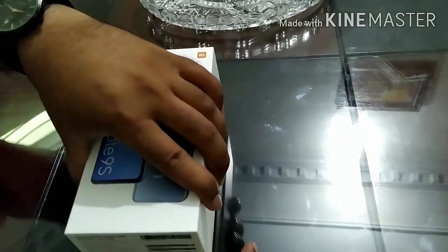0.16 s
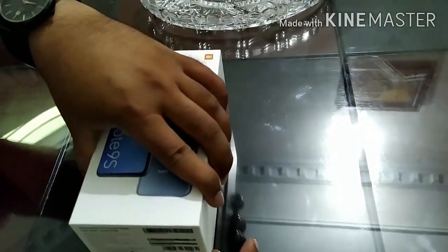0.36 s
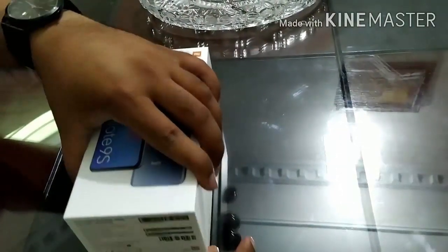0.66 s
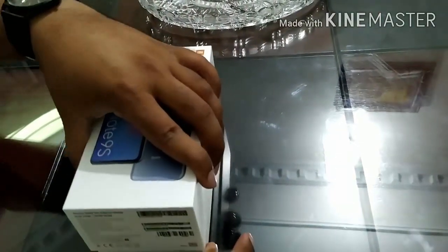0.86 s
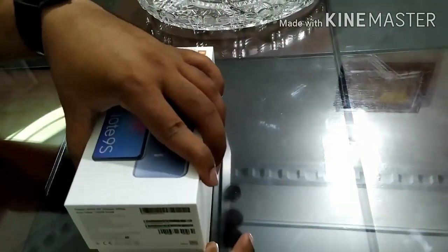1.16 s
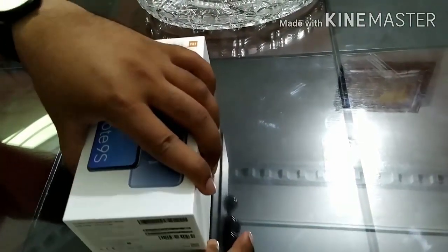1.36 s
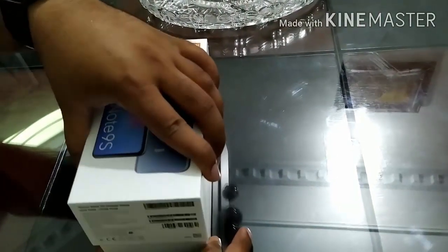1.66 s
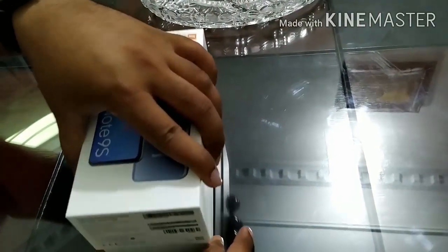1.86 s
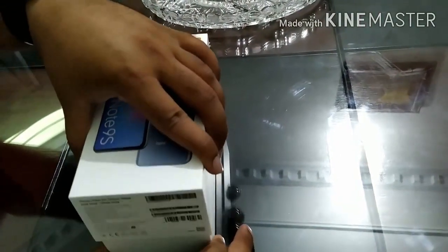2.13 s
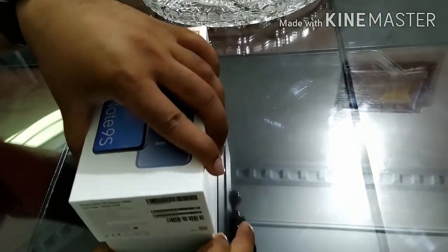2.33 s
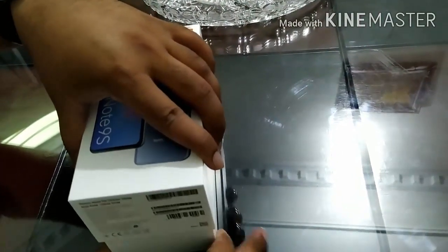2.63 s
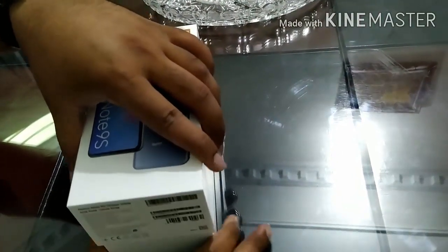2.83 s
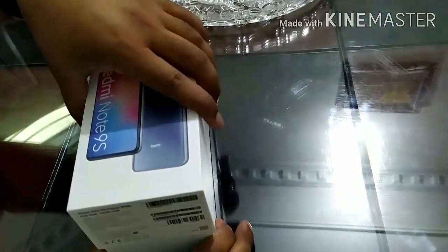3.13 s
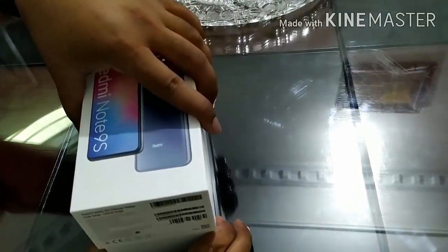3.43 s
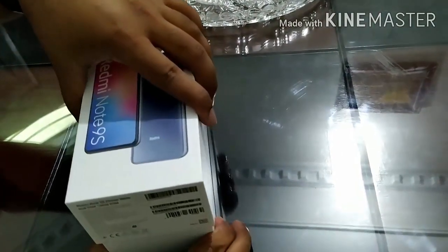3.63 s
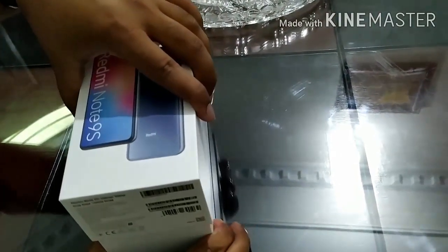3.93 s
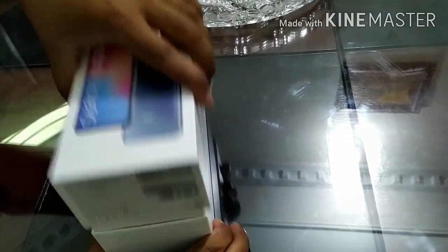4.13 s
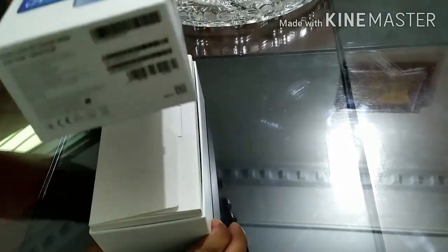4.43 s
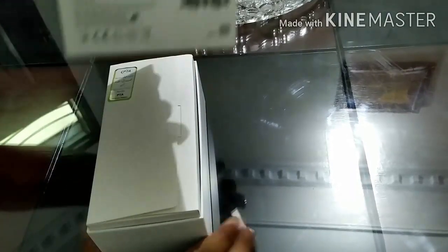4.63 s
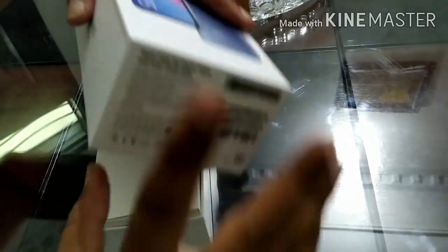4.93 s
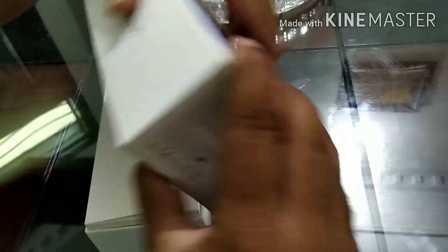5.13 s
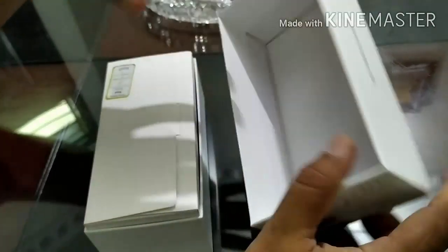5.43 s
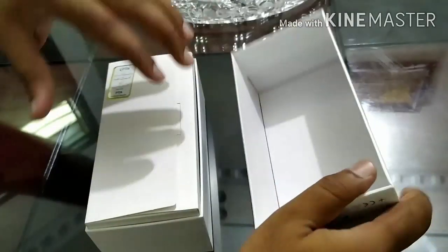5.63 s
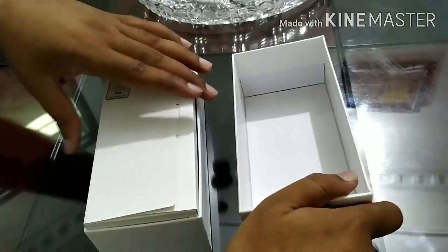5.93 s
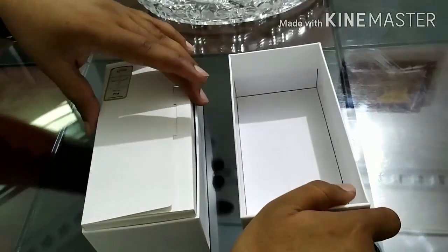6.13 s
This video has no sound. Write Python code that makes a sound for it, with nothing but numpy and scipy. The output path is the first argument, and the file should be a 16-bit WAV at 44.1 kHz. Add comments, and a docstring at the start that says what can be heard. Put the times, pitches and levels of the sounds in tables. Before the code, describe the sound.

A stiff cardboard box is bumped repeatedly on a table, with faint finger rubs and clicks, until the lid comes free with a pop.

```python
"""A low hum and a soft hiss fill a small boomy room, with faint thin squeaks now and then.
A stiff cardboard box is bumped on a glass table to loosen its tight lid; each thump booms in the room.
The lid rubs along the box, fingers shift on the paper, and nails or card edges slip off with clicks.
The lid leaves with a pop as air rushes in, is turned over, and is set down with a hollow knock."""
import sys
import numpy as np
from scipy import signal
from scipy.fft import rfft, irfft, next_fast_len
from scipy.io import wavfile
from scipy.ndimage import uniform_filter1d, map_coordinates

SR = 44100
rng = np.random.default_rng(int(sys.argv[2]) if len(sys.argv) > 2 else 0)


def transcribe(signal):
    """Save signal, clipped to [-1, 1], as a 16-bit WAV file at the path in sys.argv[1]."""
    frames = np.atleast_2d(signal).T
    limited = np.clip(frames, -1, 1)
    pcm = np.round(limited * 32767).astype(np.int16)
    wavfile.write(sys.argv[1], SR, pcm)


N = 277521

# The colour of the room's hiss: f/Hz, level/dB
HISS_COLOUR = [(15, -39), (25, -9), (93, -1), (160, -18.5), (240, -12.5), (445, -19), (482, -20),
               (582, -24.5), (684, -23), (1020, -26), (1140, -27), (3340, -32), (4620, -34.5),
               (5280, -35.5), (15500, -40)]

def background():
    """A soft hiss and a wavering low hum go on throughout."""
    hiss = unit(filtered(rng.standard_normal(N), lambda f: amp(along(HISS_COLOUR, f))))
    hum = wavering_tone(N, hz=96.94, width_hz=10.7)
    return amp(-51.5) * hiss + amp(-54.5) * hum


# The higher tones of a squeak: multiple of its pitch, level/dB added to its overtone level
SQUEAK_OVERTONES = [(1.71, 0), (2.54, -4)]
# Faint thin squeaks: t/s, length/s, f/Hz, width/Hz, level/dB, overtone level/dB
THIN_SQUEAKS = [(.11, .14, 4700, 400, -66.5, -20), (.68, .1, 1693, 140, -58, -20),
                (1.39, .26, 3817, 400, -58, -21), (1.42, .17, 4600, 370, -62.5, -21),
                (1.74, .1, 4100, 900, -60, -20), (1.85, .1, 3950, 520, -67, 7.5),
                (2.19, .21, 3620, 370, -60, -4.5), (2.7, .1, 4400, 900, -56, -20),
                (5.26, .18, 4600, 800, -60.5, -15)]

def squeaks(flutter_db=3):
    """Narrow bands of hiss with two overtones swell, flutter and fade."""
    out = np.zeros(N)
    for s, length, hz, width_hz, db, overtones_db in THIN_SQUEAKS:
        tone = wavering_tone(SR, hz, width_hz)
        for multiple, own_db in SQUEAK_OVERTONES:
            tone += amp(overtones_db + own_db) * wavering_tone(SR, multiple * hz, width_hz)
        wobble = unit(uniform_filter1d(rng.standard_normal(SR), size=900))
        flutter = unit(amp(flutter_db * wobble))
        swell = held(0, length, attack_s=.04, release_s=.055)[:SR]
        add(out, s, amp(db) * swell * flutter * tone)
    return out


# The notes of the full box on the table: f/Hz, width/Hz, level/dB
BOX_NOTES = [(99, 53, 2), (430, 241, -3), (545, 206, -3), (800, 210, -10.5), (1072, 136, -9)]
# The box lands or is pressed down: t/s, level/dB, hardness/Hz, panel f/Hz, panel's share/dB
BOX_BUMPS = [(.3458, 24.3, 490, 344, -26), (.527, 2, 480, 243, 6), (.7786, 29.3, 1950, 1880, -25),
             (.928, 14.5, 397, 302, -11.5), (1.0887, 23, 560, 420, -16), (1.6788, 26.6, 1150, 1800, -24),
             (2.208, 29, 1245, 443, -32), (2.6592, 28, 1300, 406, -6), (3.171, 15.5, 81, 400, -30),
             (3.289, 14, 81, 400, -30)]

def box_bumps(edge_lead_s=0.0089, edge_db=-24):
    """One edge grazes the glass, then the heavy box thumps down, rings one panel and ticks."""
    out = np.zeros(N)
    for s, db, hardness_hz, panel_hz, panel_db in BOX_BUMPS:
        thump = amp(db) * blow(BOX_NOTES, hardness_hz)
        panel = amp(db + panel_db) * blow([(panel_hz, 170, 0)], hardness_hz)  # 170 Hz wide
        tick_db = db - 73.5 + 4 * np.log2(hardness_hz / 1000)  # harder contacts tick more
        add(out, s - edge_lead_s, amp(db + edge_db) * blow(BOX_NOTES, min(hardness_hz, 700)))
        add(out, s, room(thump - panel, wet_db=-1) + boom(thump))
        add(out, s, room(amp(tick_db) * tick(pitch_hz=3600, life_s=0.0032), wet_db=-6))
    return out


# The colour of the lid rubbing on the box: f/Hz, level/dB
SLIDE_COLOUR = [(100, -9), (300, 2), (700, -6.5), (1150, -4.5), (1700, -17), (4000, -18.5), (12000, -35)]
# Pulls on the lid: t/s, length/s, level/dB
LID_PULLS = [(.63, .85, -57), (3.6, .58, -56.5), (6.22, .1, -55)]

def lid_slide():
    """The tight lid rubs faintly as it creeps along the box."""
    pull = sum(amp(db) * held(s, length, attack_s=.06, release_s=.07) for s, length, db in LID_PULLS)
    return pull * unit(filtered(friction(N), lambda f: amp(along(SLIDE_COLOUR, f))))


# Skin slides on paper: loudest t/s, rise/s, level/dB, brightness/dB per octave
FINGER_RUBS = [(.875, .038, -47.3, -6.5), (.938, .035, -54, 1.5), (1.427, .027, -52, -7),
               (1.878, .014, -49, -3.5), (2.795, .065, -51.5, -6.5), (2.868, .05, -46, -2.5),
               (3.21, .025, -58.5, 4), (3.62, .1, -64.5, 4), (4.705, .028, -55.5, -2.5),
               (4.781, .033, -54.5, 6), (4.889, .027, -47.5, .5), (5.87, .035, -51.5, -9)]

def finger_rubs():
    """Fingers shift their grip in short strokes."""
    out = np.zeros(N)
    for s, rise_s, db, tilt_db in FINGER_RUBS:
        rub = amp(db) * stroke(rise_s, 1.1 * rise_s, tilt_db, rasp_hz=7100)
        add(out, s - .5, room(rub, wet_db=-5))
    return out


# A nail or card edge slips: t/s, click level/dB, scrape level/dB, f/Hz
EDGE_SNAPS = [(1.6788, -37, -70, 5000), (2.8315, -22.5, -42, 11000), (2.983, -34.5, -55, 5500),
              (2.985, -32.5, -46, 10400), (3.024, -38, -52, 10800), (3.091, -46, -56, 7200),
              (4.206, -24, -46, 5830), (4.7385, -32, -45, 13500), (5.157, -48, -55.5, 2300),
              (5.229, -49, -49, 5400), (5.2425, -37.5, -42, 13000), (5.8207, -42, -66, 3840)]

def edge_snaps():
    """Nails and card edges scrape briefly and slip off with dry clicks."""
    out = np.zeros(N)
    for s, click_db, scrape_db, pitch_hz in EDGE_SNAPS:
        tilt_db = 2.5 * np.log2(pitch_hz / 9000)  # higher scrapes are brighter
        scrape = amp(scrape_db) * stroke(rise_s=.012, fall_s=.012, tilt_db=tilt_db, rasp_hz=pitch_hz)
        add(out, s - .5, room(scrape, wet_db=-5))
        click = amp(click_db) * tick(pitch_hz, life_s=0.0015, ping_db=14.5, ping_octaves=0.3)
        add(out, s, room(click, wet_db=-6))
    return out


# The notes of the hollow lid: f/Hz, width/Hz, level/dB
LID_NOTES = [(140.6, 34, -12.5), (236, 18, 3.5), (312, 30, 2.5), (460, 58, 0), (795, 98, -0.5),
             (1150, 130, -5.5), (1370, 155, -15.5), (1950, 40.3, -15), (2250, 110, -21)]
# The lid is touched, knocked and set down: t/s, level/dB, hardness/Hz
LID_TAPS = [(4.2398, 18.5, 1720), (4.2815, 6, 1080), (2.831, 3.5, 1110), (2.984, 2, 1090),
            (5.1554, -4, 3510), (5.2414, 4, 2520), (5.281, 2.5, 420), (5.8208, 21, 4080), (5.826, 22, 1657)]

def lid_taps():
    """The hollow lid rings when it meets fingers or the table."""
    out = np.zeros(N)
    for s, db, hardness_hz in LID_TAPS:
        knock = amp(db) * blow(LID_NOTES, hardness_hz)
        add(out, s, room(knock, wet_db=-2) + amp(0.5) * boom(knock))
    return out


# The notes of the air inside the lid: f/Hz, width/Hz, level/dB
AIR_NOTES = [(168, 99, 3.5), (389, 109, 3), (554, 113, -3.5), (825, 85, -2.5), (1080, 140, -9),
             (2440, 300, -25.5)]

def lid_pop(free_s=4.2045, rush_after_s=.023):
    """The rim scrapes free, the suction under the lid lets go, air rushes in and rings briefly."""
    out = np.zeros(N)
    puff = amp(31) * blow(AIR_NOTES, hardness_hz=2380, low_hz=120)
    add(out, free_s, room(puff, wet_db=-3.5) + amp(-11) * boom(puff))
    rim = amp(-30) * stroke(rise_s=.0075, fall_s=.006, tilt_db=2, rasp_hz=2400)
    rush = amp(-42) * stroke(rise_s=.025, fall_s=.014, tilt_db=-4.5, rasp_hz=11300)
    add(out, free_s - .5, room(rim, wet_db=-5))
    add(out, free_s + rush_after_s - .5, room(rush, wet_db=-5))
    return out


# The notes of the lid's walls while it is held: f/Hz, width/Hz, level/dB
HELD_LID_NOTES = [(273, 27, 8.5), (410, 290, -5), (840, 140, -4), (1270, 140, -4), (1570, 190, -8)]

def lid_turn(peak_s=5.248, fade_s=.019):
    """The lid scuffs hollowly as it turns in the palm."""
    t = np.arange(N) / SR - peak_s
    swell = amp(-37.5) * np.exp(-np.abs(t) / fade_s)
    scuff = swell * unit(filtered(friction(N), lambda f: ring(HELD_LID_NOTES, f)))
    return room(scuff, wet_db=-10)


def wavering_tone(size, hz, width_hz):
    """Noise narrowed to a thin band around one pitch."""
    return unit(filtered(rng.standard_normal(size), lambda f: ring([(hz, width_hz, 0)], f) ** 2))


def blow(modes, hardness_hz, low_hz=60):
    """One push rings a body's notes; a harder contact lets more treble through."""
    push = signal.unit_impulse(SR)
    return filtered(push, lambda f: ring(modes, f) * soften(f, hardness_hz) * 1j * f / (low_hz + 1j * f))


# How long the room's echo lasts: f/Hz, time/s to fade by 60 dB
ECHO_FADE = [(100, 0.81), (400, 0.4), (1100, 0.44), (3000, 0.41), (8000, 0.5), (15000, 0.29)]
# The colour of that echo against the direct sound: f/Hz, level/dB
ECHO_COLOUR = [(60, -4), (170, -8.5), (300, -1), (1000, -2), (3000, 6), (12000, -1)]

def room(x, wet_db, build_s=0.007):
    """A sound plus its wash of echoes, which is new for every place of the hand."""
    hz, t, noise = signal.stft(rng.standard_normal(SR // 2), SR, nperseg=256)
    shape = amp(-60 * t / along(ECHO_FADE, hz)[:, None]) * (1 - np.exp(-t / build_s))
    energy = np.sum(shape ** 2, axis=1, keepdims=True) * t[1] * SR
    shape *= amp(along(ECHO_COLOUR, hz))[:, None] / np.sqrt(energy)
    tail = signal.istft(noise * shape, SR, nperseg=256)[1]
    return x + amp(wet_db) * signal.fftconvolve(x, tail)[:len(x)]


# Bass bouncing off the walls: delay/s, level/dB
WALL_ECHOES = [(0.0081, 7), (0.0228, 7.5), (0.0285, -11.5), (0.0372, 8.5), (0.043, -1.3), (0.0519, 6.5),
               (0.0661, 2.9)]
# The room's own deep notes (standing waves): f/Hz, width/Hz, level/dB
ROOM_NOTES = [(51, 3.2, -4), (70.9, 3.52, 20.5), (140.3, 2, 13.5), (175.4, 5.35, 19.5)]

def boom(x, bass_hz=150):
    """A knock drives the room's bass: wall echoes and standing waves."""
    echoes = lambda f: sum(amp(db) * np.exp(-2j * np.pi * f * delay) for delay, db in WALL_ECHOES)
    return filtered(x, lambda f: echoes(f) / (1 + (f / bass_hz) ** 4) + ring(ROOM_NOTES, f, sign=0.82))


# The colour of paper, in ticks and strokes: f/Hz, level/dB
PAPER_COLOUR = [(200, -80), (700, -11), (1500, -4.5), (3000, 3), (4500, 4), (5800, -1), (7500, 3),
                (9700, 4.5), (12000, -3), (15000, -7.5)]

def tick(pitch_hz, life_s, ping_db=11, ping_octaves=0.48):
    """A tiny crack of paper with one ringing pitch."""
    t = np.arange(SR) / SR
    ping = lambda f: ping_db * np.exp(-(np.log2((f + 1) / pitch_hz) / ping_octaves) ** 2)
    colour = lambda f: amp(along(PAPER_COLOUR, f) + ping(f))
    return unit(filtered(rng.standard_normal(SR), colour)) * np.exp(-t / life_s)


def friction(size, grain_db=4, grain_s=0.00076):
    """Paper fibres catch and slip: noise in tiny clumps of uneven size."""
    clumps = unit(uniform_filter1d(rng.standard_normal(size), max(int(grain_s * SR), 1)))
    return rng.standard_normal(size) * amp(grain_db * clumps)


def stroke(rise_s, fall_s, tilt_db, rasp_hz, rasp_db=6, rasp_octaves=0.32, ripple_db=2.4, ripple_hz=220):
    """A rasping stroke over paper, loudest 0.5 s into a one-second sound."""
    t = np.arange(SR) / SR - .5
    swell = np.exp(-np.abs(t / np.where(t < 0, rise_s, fall_s)) ** 2.3)
    # every grip leaves other small notes of the card free to ring
    grip = rng.standard_normal(400)
    ripple = lambda f: ripple_db * map_coordinates(grip, [f / ripple_hz], order=1)
    tilt = lambda f: tilt_db * np.log2(np.maximum(f, 500) / 5000)
    rasp = lambda f: rasp_db * np.exp(-(np.log2((f + 1) / rasp_hz) / rasp_octaves) ** 2)
    colour = lambda f: amp(along(PAPER_COLOUR, f) + tilt(f) + rasp(f) + ripple(f))
    return swell * unit(filtered(friction(SR), colour))


def held(s, length, attack_s, release_s):
    """Gain that rises from time s, holds and dies away."""
    t = np.arange(N) / SR - s
    return np.clip(t / attack_s, 0, 1) * np.exp(-np.maximum(t - length, 0) / release_s)


def amp(db):
    """Decibels to gain."""
    return 10 ** (np.asarray(db) / 20)


def unit(x):
    """Scale to rms 1."""
    return x / np.sqrt(np.mean(x ** 2) + 1e-20)


def along(points, hz):
    """(Hz, value) points read on a log axis."""
    f, v = np.transpose(points)
    return np.interp(np.log(hz + 1), np.log(f + 1), v)


def filtered(x, response):
    """x times a complex response of frequency."""
    size = next_fast_len(len(x) + SR // 8, real=True)
    return irfft(rfft(x, size) * response(np.fft.rfftfreq(size, 1 / SR)), size)[:len(x)]


def ring(modes, f, sign=-1):
    """Causal response of (Hz, width, dB) resonances."""
    return sum(sign ** k * amp(db) * 1j * f * w / (c * c - f * f + 1j * f * w)
               for k, (c, w, db) in enumerate(modes))


def soften(f, corner_hz):
    """A soft contact spreads the force in time: a steep low-pass."""
    return signal.freqs(*signal.butter(4, 1, analog=True), f / corner_hz)[1]


def add(track, s, sound):
    """Mix a sound into the track from time s."""
    start = round(s * SR)
    sound, start = sound[max(-start, 0):], max(start, 0)
    track[start:start + len(sound)] += sound[:N - start]


def scene():
    """Everything, heard from one point above the table."""
    knocks = box_bumps() + lid_pop() + lid_taps()
    handling = finger_rubs() + edge_snaps() + squeaks() + lid_slide() + lid_turn()
    return (knocks + handling + background())[None]


def record(dry, ceiling=.9, top_hz=15700):
    """The microphone thins the deepest bass, rounds the biggest peaks and cuts the highest treble."""
    thin = signal.sosfilt(signal.butter(2, 30, "highpass", fs=SR, output="sos"), dry[0])
    rounded = thin / (1 + np.abs(thin / ceiling) ** 6) ** (1 / 6)
    return filtered(rounded, lambda f: f < top_hz)[None]


dry = scene()
out = record(dry)
transcribe(out)
```